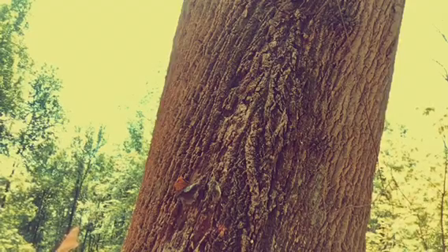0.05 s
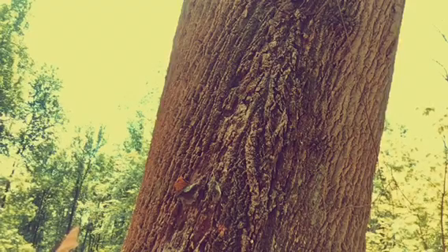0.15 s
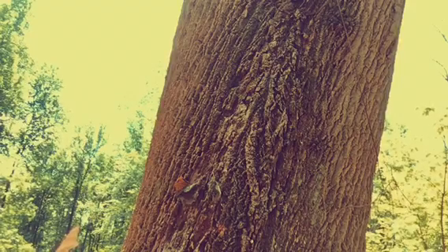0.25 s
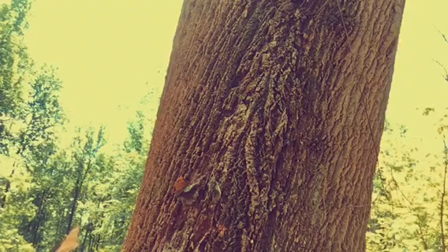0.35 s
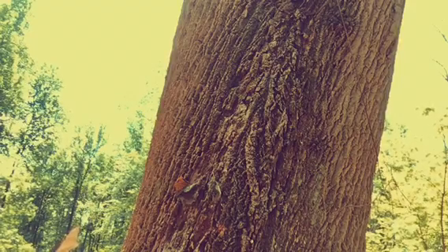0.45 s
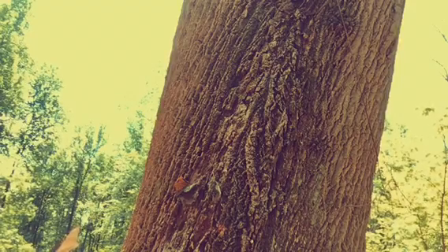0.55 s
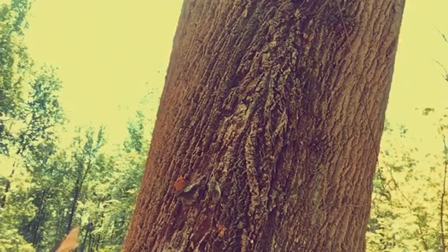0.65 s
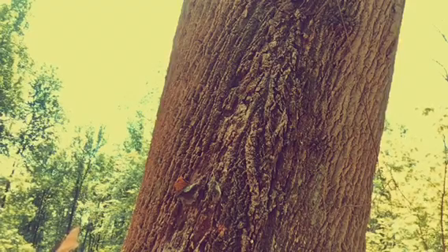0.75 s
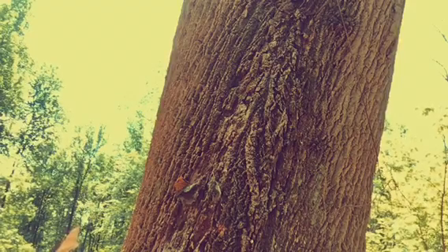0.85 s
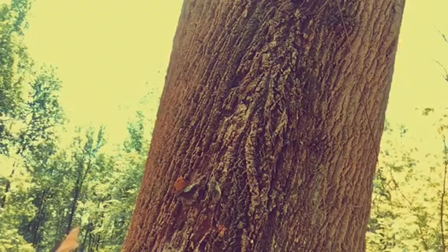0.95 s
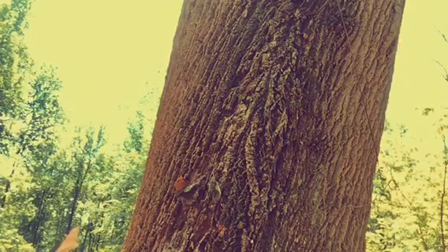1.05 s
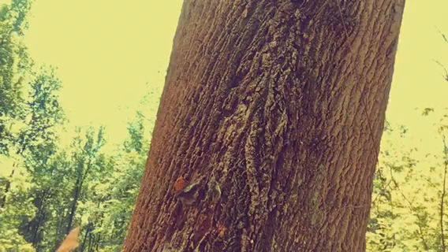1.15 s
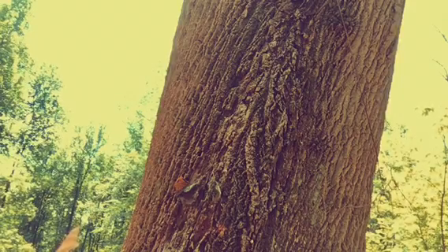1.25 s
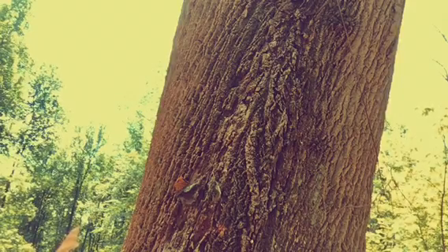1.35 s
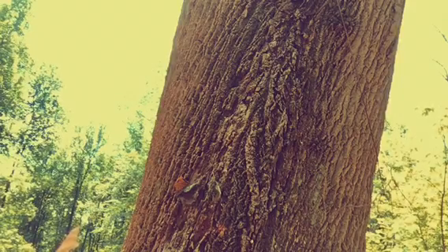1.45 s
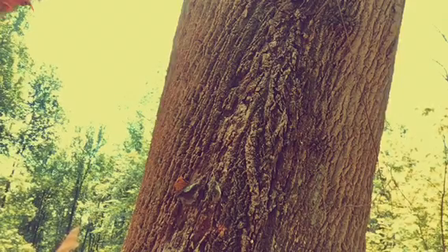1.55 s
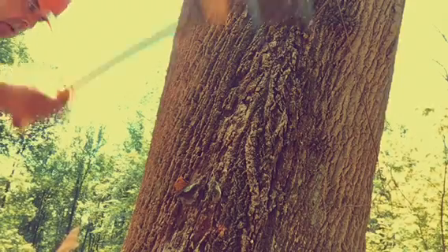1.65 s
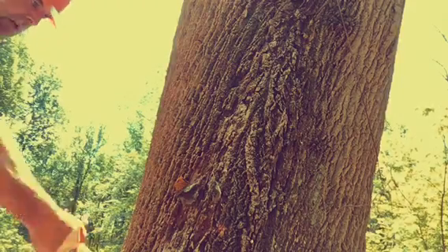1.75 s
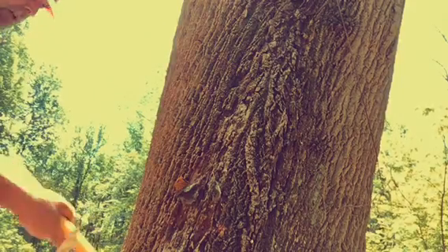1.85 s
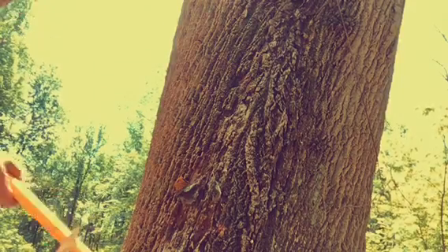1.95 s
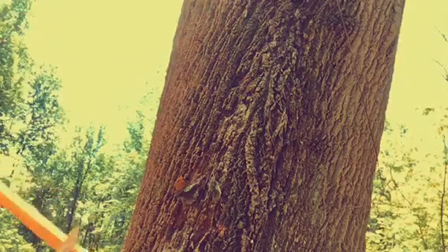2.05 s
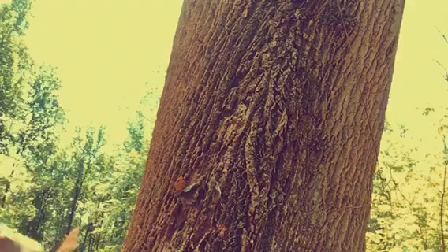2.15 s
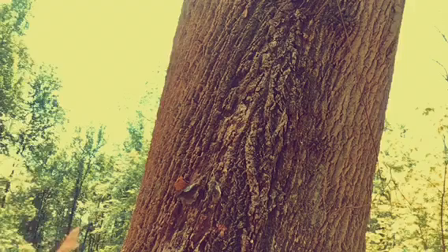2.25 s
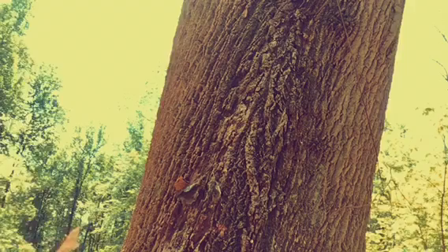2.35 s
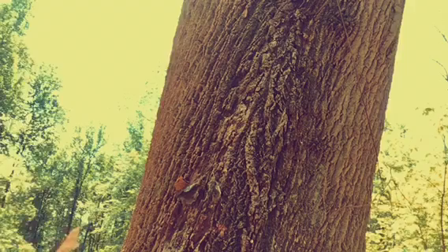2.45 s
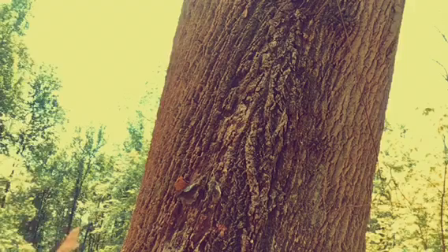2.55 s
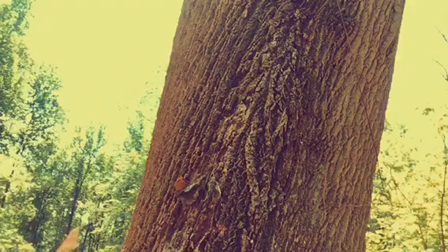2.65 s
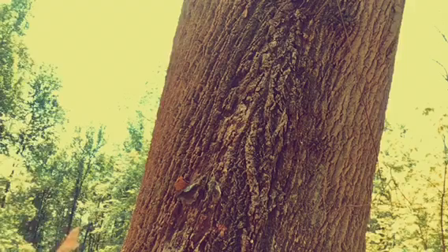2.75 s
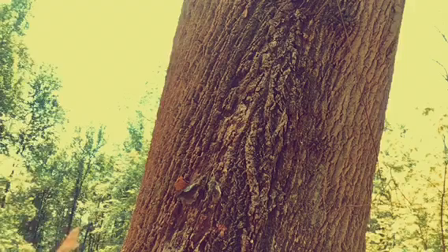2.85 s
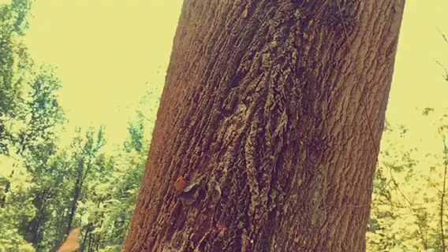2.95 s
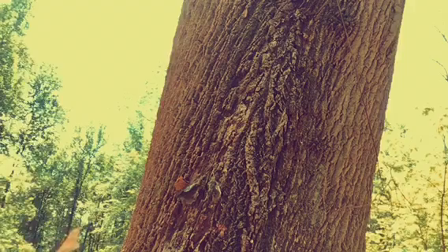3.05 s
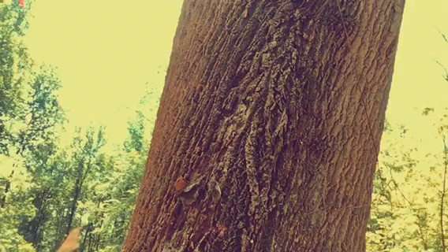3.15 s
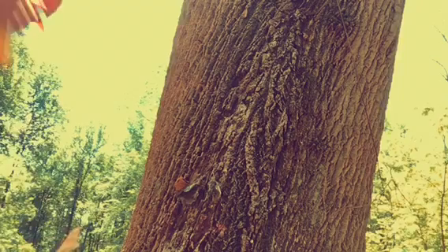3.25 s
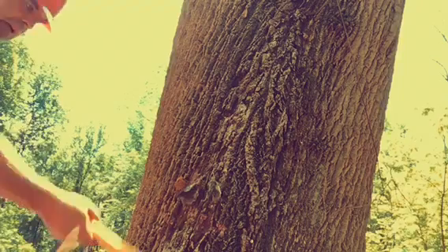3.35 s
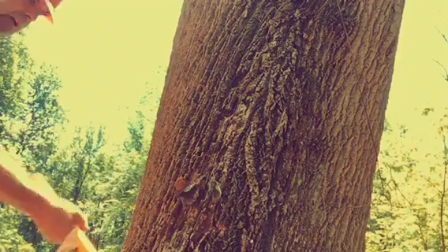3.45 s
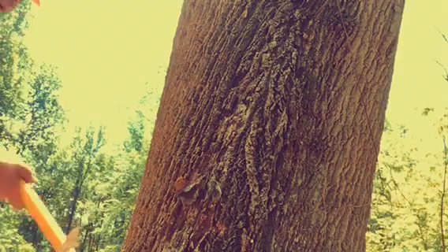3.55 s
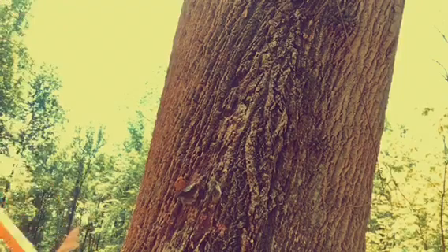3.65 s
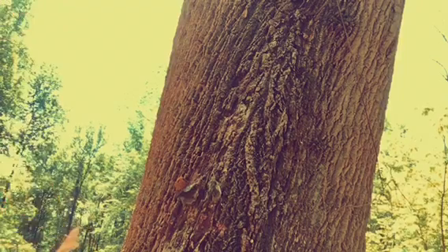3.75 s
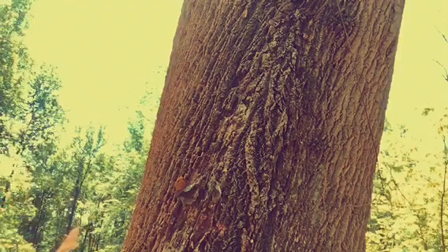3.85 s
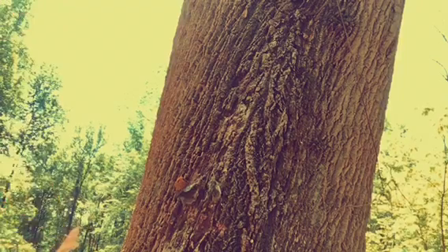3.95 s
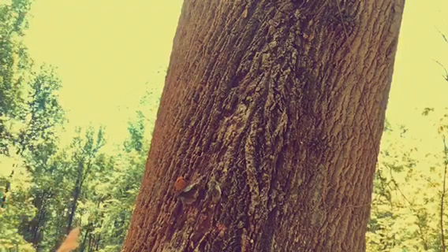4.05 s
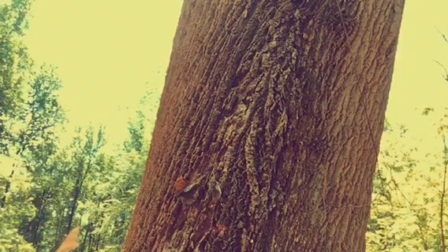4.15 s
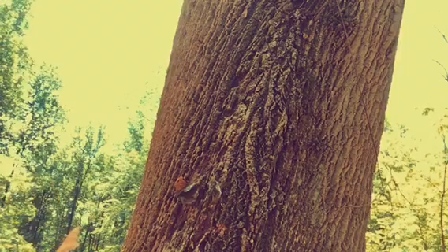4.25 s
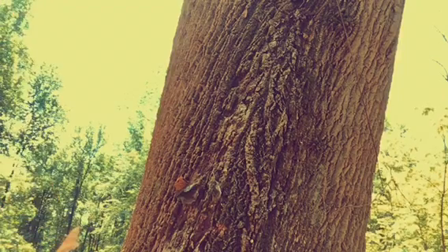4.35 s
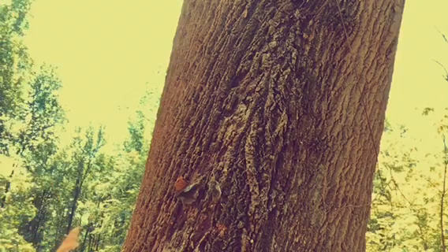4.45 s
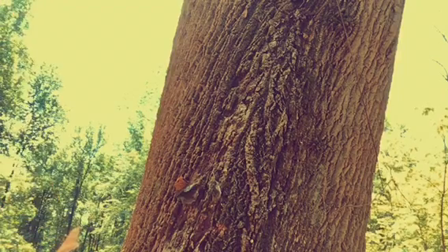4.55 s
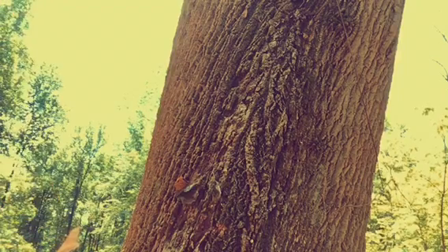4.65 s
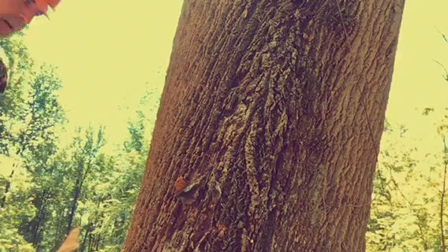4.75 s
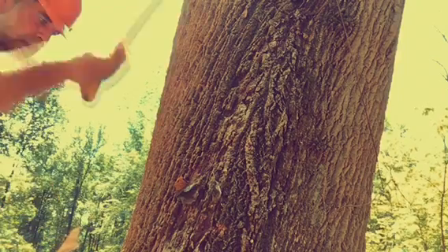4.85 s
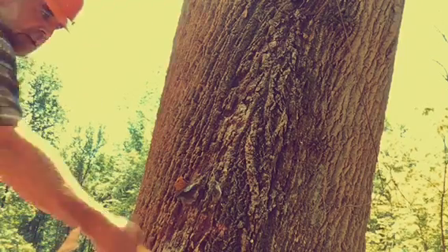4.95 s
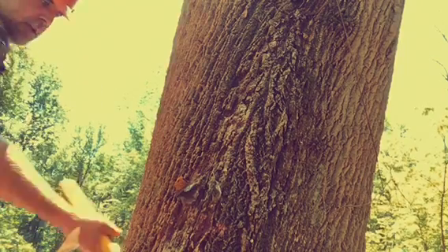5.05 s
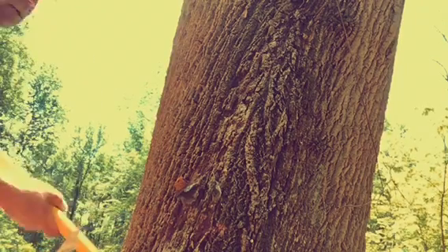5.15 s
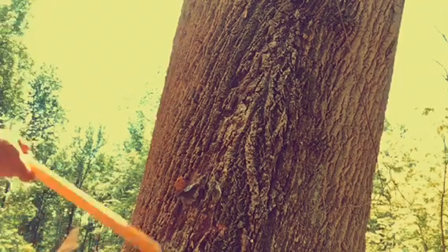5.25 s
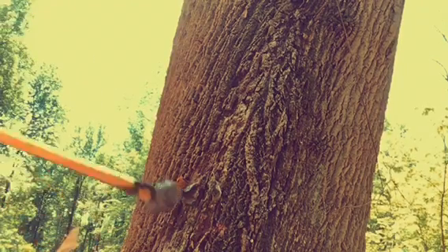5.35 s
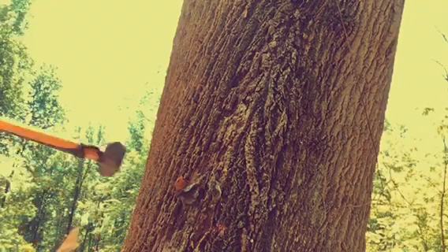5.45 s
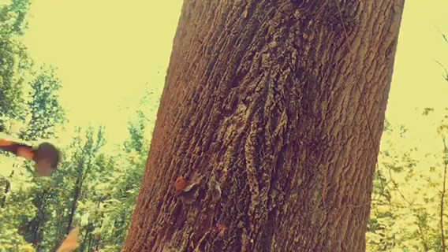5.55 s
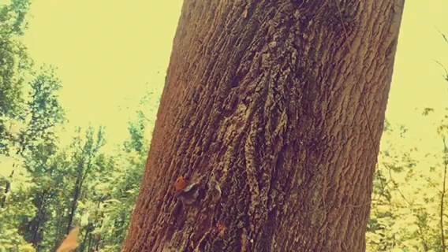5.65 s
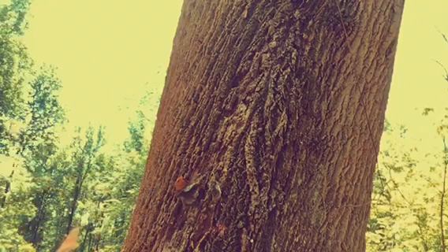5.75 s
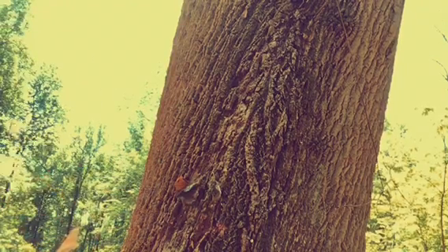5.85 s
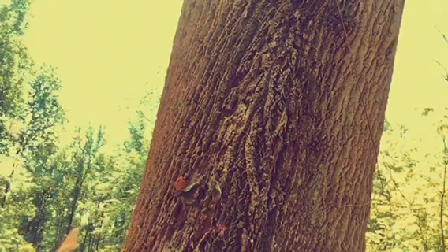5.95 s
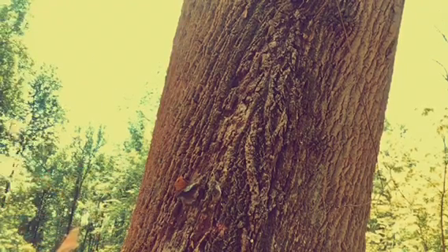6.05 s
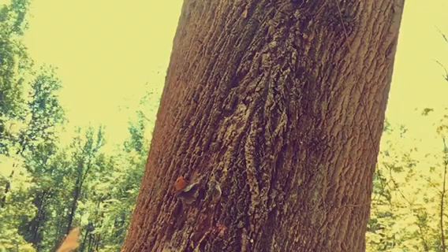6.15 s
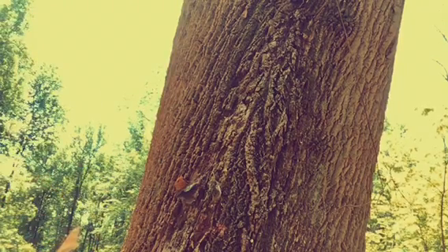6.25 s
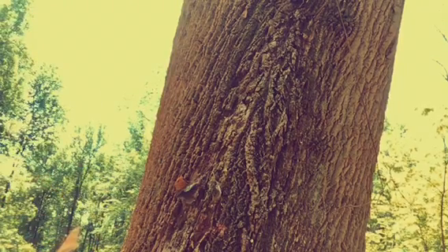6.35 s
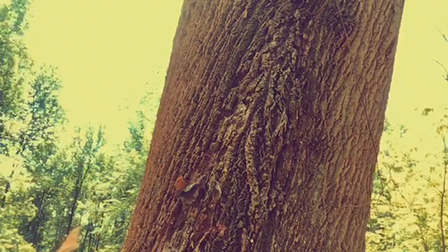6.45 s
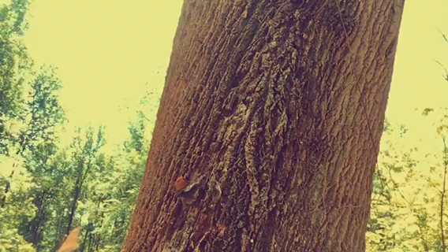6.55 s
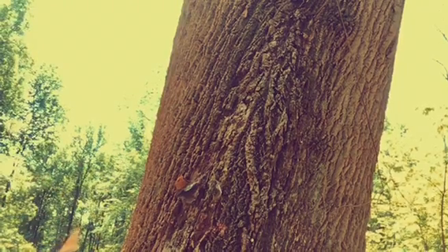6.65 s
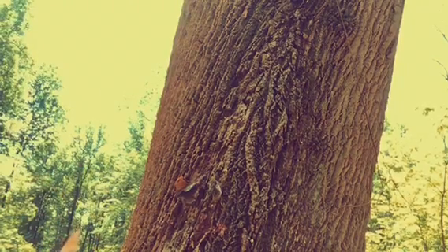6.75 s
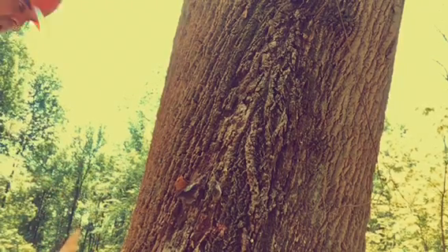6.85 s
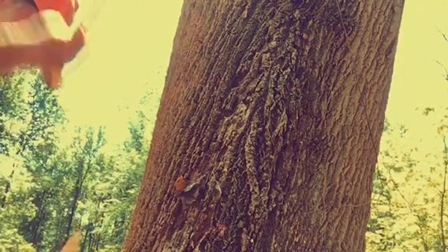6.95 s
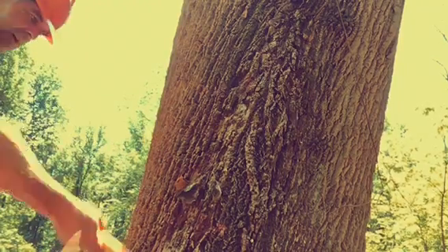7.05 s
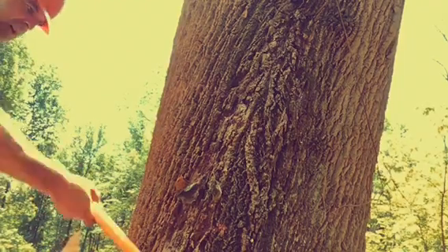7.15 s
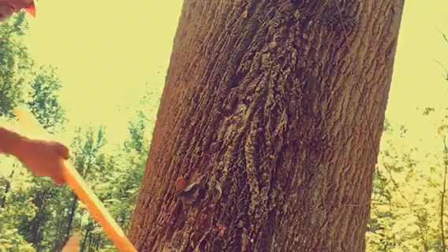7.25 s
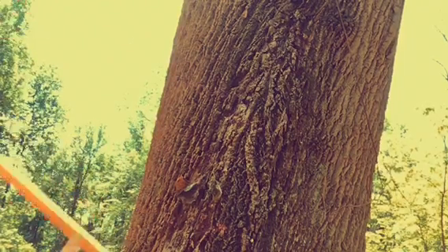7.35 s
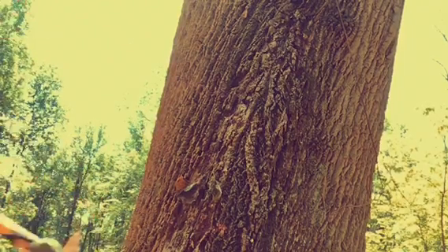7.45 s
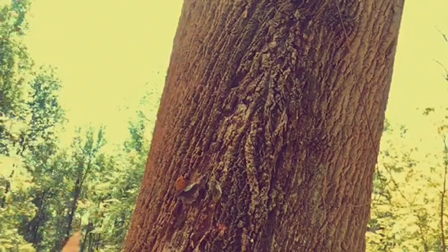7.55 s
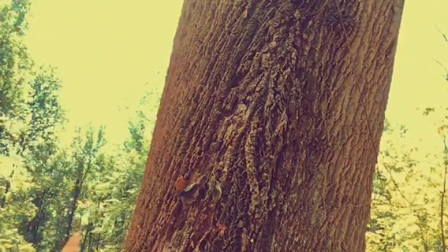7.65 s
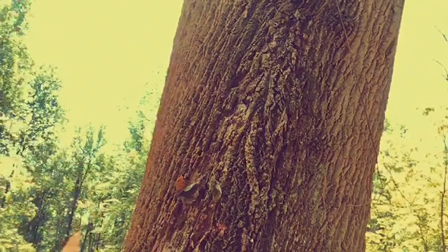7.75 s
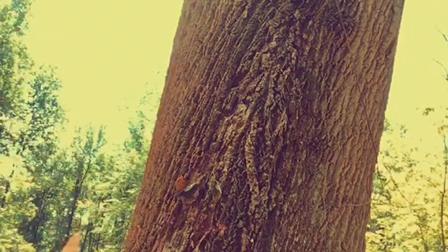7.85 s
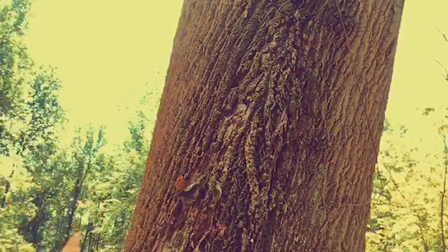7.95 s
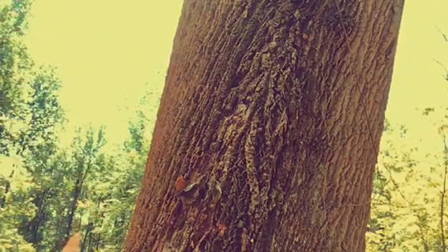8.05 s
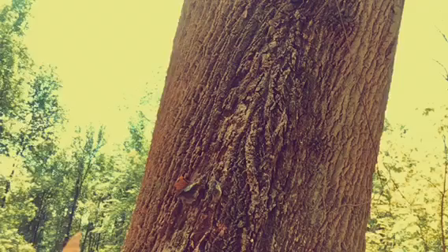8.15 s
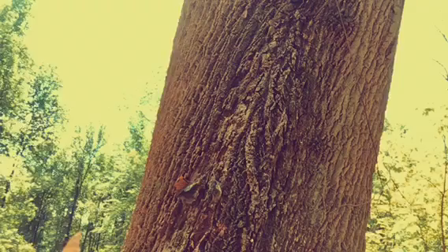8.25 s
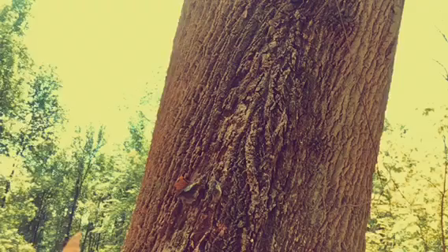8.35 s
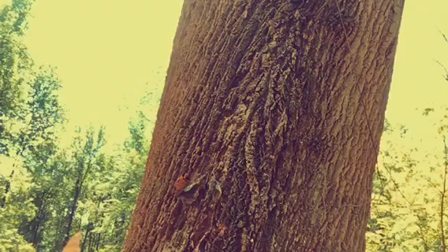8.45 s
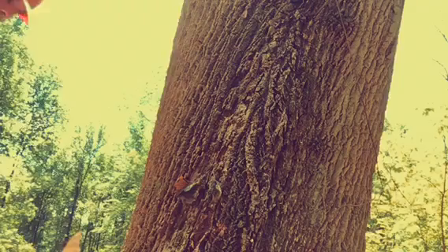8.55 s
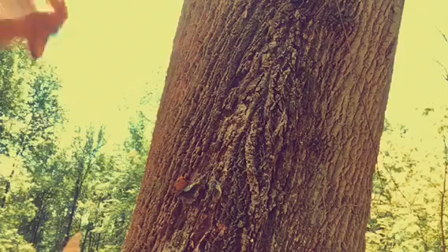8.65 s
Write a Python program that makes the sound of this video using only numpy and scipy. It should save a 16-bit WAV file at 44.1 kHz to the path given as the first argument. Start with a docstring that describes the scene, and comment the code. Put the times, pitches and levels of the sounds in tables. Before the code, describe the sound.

Close, mono sound of tree chopping: soft leaf litter and a faint low drone first, then four hard axe hits, each preceded by a brief faint swish and tiny ticks. The wood cracks sharply, the trunk thumps, and the forest answers with a fading echo. A distant bird whistles before the second stroke; twigs crack underfoot after the third, chips fall after the last, then it quietens.

```python
"""Four axe strokes bite into a standing tree, close enough to overload the microphone.
Noise bands that die at their own rates make each crack of splitting wood and the late answer of the woods.
Sines swell for the shaken trunk and ring thinly for the steel; shaped noise swishes and ticks ahead of each blow.
Between strokes short noise contacts tick as bark chips, sticks and footfalls, and grains crackle as dry leaves.
A far bird whistles in gliding sines, over filtered noise for a low rumble, a drone and a hush of foliage."""
import sys
import numpy as np
from scipy import signal
from scipy.fft import rfft, irfft, next_fast_len
from scipy.io import wavfile

SR = 44100
rng = np.random.default_rng(int(sys.argv[2]) if len(sys.argv) > 2 else 0)


def int16_out(signal):
    """Quantize to a 16-bit WAV file."""
    q = np.round(np.clip(np.atleast_2d(signal).T, -1, 1) * 32767)
    wavfile.write(sys.argv[1], SR, q.astype(np.int16))


N = 383229
TIME = np.arange(N) / SR

# axe strokes into the trunk: t/s, swish level/dB, tick level/dB, puff level/dB, crack level/dB,
# knock f/Hz, knock boost/dB, splinter f/Hz, splinter boost/dB, brightness/(dB per octave),
# trunk level/dB, steel level/dB, woods level/dB (relative to the crack)
STROKES = [(1.8257, -29, -8, -20, 8.5, 1730, 10, 2072, 4, .5, 1, -28, -3),
           (3.454, -25.5, 0.5, 6.5, 0.5, 1493, 5, 4473, 7.5, 2.2, -1.5, -56, 3),
           (5.0440, -27.5, -7, -21, 6.5, 640, 7, 4210, 1, 1, 2, -26, 0.5),
           (7.1404, -23, -2, -15, 5.5, 1332, 6.5, 3853, 9, -1.32, -1.5, -49, -3.5)]
# spectrum of dry leaves and litter: f/Hz, relative level/(dB per Hz)
LEAVES = [(300, 0.5), (1000, -1.5), (1900, 2.5), (3500, 1.5), (7000, -3), (11000, -9.5), (15500, -15.5)]
# spectrum of low rumble, in air, soil and trunk: f/Hz, relative level/(dB per Hz)
RUMBLE = [(20, -26), (40, -9), (62, 4), (85, -0.5), (130, -10.5), (200, -15), (270, -18.5), (400, -54)]


def from_db(db):
    """Turn decibels into an amplitude factor."""
    return 10 ** (np.asarray(db) / 20)


def rms_one(x):
    """Scale a sound to an rms of 1."""
    return x / np.sqrt(np.mean(x ** 2) + 1e-20)


def at_hz(points, hz):
    """Read a table on a log-frequency axis."""
    table = np.array(points)
    return np.interp(np.log(hz), np.log(table[:, 0]), table[:, 1])


def add(out, s, sound):
    """Mix a sound in from time s."""
    start = max(round(s * SR), 0)
    out[start:start + len(sound)] += sound[:N - start]


def dying(t, t60):
    """Exponential decay that falls 60 dB in t60 seconds."""
    return from_db(-60 * t / t60)


def swell(t, middle_s, width_s):
    """A smooth rise and fall, 1 at its middle."""
    return np.exp(-((t - middle_s) / width_s) ** 2)


def coloured(x, spectrum, tilt_db=0):
    """Give a noise a spectrum, tilted in dB per octave; rms 1."""
    size = next_fast_len(len(x))
    hz = np.maximum(np.fft.rfftfreq(size, 1 / SR), 1)
    gain = from_db(at_hz(spectrum, hz) + tilt_db * np.log2(hz))
    return rms_one(irfft(rfft(x, size) * gain, size)[:len(x)])


def band(x, low_hz, high_hz):
    """Keep one band of a sound, with gentle slopes."""
    edges = [low_hz, min(high_hz, .45 * SR)]
    return signal.sosfilt(signal.butter(2, edges, "band", fs=SR, output="sos"), x)


def boosted(x, hz, db, sharpness):
    """Raise one resonance out of a sound; sharpness is its Q."""
    peak = signal.lfilter(*signal.iirpeak(hz, sharpness, fs=SR), x)
    return x + (from_db(db) - 1) * peak


def burst(t, spectrum, t60s, tilt_db=0):
    """Noise in half-octave bands, each dying at its own rate; starts at about rms 1."""
    edges = np.geomspace(140, 17000, 15)
    centres = np.sqrt(edges[1:] * edges[:-1])
    levels_db = at_hz(spectrum, centres) + tilt_db * np.log2(centres)
    gains = from_db(levels_db) * np.sqrt(np.diff(edges))  # per-Hz level to band level
    bands = []
    for low, high, hz in zip(edges, edges[1:], centres):
        noise = rms_one(band(rng.standard_normal(len(t)), low, high))
        bands.append(noise * dying(t, at_hz(t60s, hz)))
    return gains @ np.array(bands) / np.linalg.norm(gains)


def contacts(rows, spread, crest_db, attack_s, body_db=-9):
    """Short ticks and knocks: a broad noise resonance over a duller body, dying within a short time."""
    out, t = np.zeros(N), TIME[:SR // 5]
    for s, db, hz, t60 in rows:
        width = 1 + abs(spread)
        crunch = rms_one(band(rng.standard_normal(len(t)), hz / width, hz * width))
        body = rms_one(band(rng.standard_normal(len(t)), hz / 10, hz / 2))
        envelope = dying(t, t60) * (1 - np.exp(-t / attack_s))
        # crest_db is the headroom from the listed level down to the noise's rms
        add(out, s, from_db(db - crest_db) * (crunch + from_db(body_db) * body) * envelope)
    return out


def scattered(x, wet_db=-14, t60=0.3):
    """A short wash of dying noise, as from the trunks around, trails a sound."""
    t = TIME[:SR // 2]
    wash = rng.standard_normal(len(t)) * dying(t, t60)
    return x + from_db(wet_db) * signal.fftconvolve(x, wash / np.linalg.norm(wash))[:N]


def cracks(bite_s=0.00092, attack_s=0.00081):
    """Fibres split as the blade sinks in; each cut colours its crack and echo with two resonances of its own."""
    # splitting wood: f/Hz, relative level/(dB per Hz)
    crack_spectrum = [(150, -3.5), (300, 16), (500, 1.5), (750, 13.5), (1300, 8.5), (2200, 2), (2800, 1),
                      (4000, -2), (6500, -20.5), (10000, -17.5), (15500, -8)]
    # decay of the splitting: f/Hz, t60/s
    crack_t60s = [(150, 0.17), (500, 0.058), (1000, 0.041), (2500, 0.047), (15000, 0.055)]
    # resonances of the wood common to all strokes: f/Hz, boost/dB
    wood_resonances = [(770, 0.5), (2150, 3.5), (3400, 3), (6000, 10), (7000, 6), (8500, 11.5), (12200, 3)]
    out, t = np.zeros(N), TIME[:3 * SR // 2]
    for s, _, _, _, db, knock_hz, knock_db, splinter_hz, splinter_db, tilt_db, _, _, woods_db in STROKES:
        crack = from_db(woods_db) * woods(t, tilt_db)
        since_bite = np.maximum(t[:SR // 4] - bite_s, 0)  # full level until the blade has sunk in
        add(crack, 0, burst(since_bite, crack_spectrum, crack_t60s, tilt_db))
        crack = crack * (1 - np.exp(-t / attack_s))
        crack = boosted(crack, knock_hz, knock_db, sharpness=26.0)
        crack = boosted(crack, splinter_hz, splinter_db, sharpness=6.2)
        ring = cut_ring(t, [(knock_hz, knock_db), (splinter_hz, splinter_db)])
        add(out, s, from_db(db) * (crack + ring))
    for hz, db in wood_resonances:
        out = boosted(out, hz, db, sharpness=8.5)
    return out


def cut_ring(t, resonances, ring_db=-11, ring_t60=0.032):
    """The wood around the cut rings briefly at its resonances, given as (f/Hz, relative level/dB)."""
    ring = sum(from_db(ring_db + db) * np.sin(2 * np.pi * hz * t) for hz, db in resonances)
    return ring * dying(t, ring_t60)


def woods(t, tilt_db, near_db=-23, near_t60=0.3, far_db=-35, edge_s=0.2, clearing_db=-8, edge_width_s=0.032):
    """Nearby trunks scatter a crack at once; the echo lifts when the edge of the clearing is reached."""
    # scatter from the nearby ground and trunks: f/Hz, relative level/(dB per Hz)
    near_spectrum = [(200, 1), (700, 0.5), (1500, -3.5), (2700, -7), (4000, -5.5), (6500, -20.5),
                     (10000, -22), (15000, -20.5)]
    # echo of the far trees: f/Hz, relative level/(dB per Hz)
    far_spectrum = [(200, -3), (500, -5.5), (1000, 3.5), (1500, 0), (2200, -0.5), (2800, -3), (4000, -2.5),
                    (6500, -23), (10000, -18), (15000, -68)]
    # decay of that echo: f/Hz, t60/s
    far_t60s = [(200, 3.47), (1500, 2.27), (4000, 1.71), (9000, 1.32), (15000, 0.3)]
    near = coloured(rng.standard_normal(len(t)), near_spectrum, tilt_db) * dying(t, near_t60)
    reached = (1 + np.tanh((t - edge_s) / edge_width_s)) / 2
    far = burst(t, far_spectrum, far_t60s, tilt_db) * from_db(clearing_db * (1 - reached))
    return from_db(near_db) * near + from_db(far_db) * far


def trunk(lag_s=0.00635, shove_db=4, shove_hz=44, shove_t60=0.061, shudder_db=-17, shudder_t60=1.0):
    """The blade shoves the trunk; each bending mode swells in its own time, and the crown shudders on."""
    # bending modes of the trunk: f/Hz, relative level/dB, swell/s, t60/s (from the end of the swell)
    bending_modes = [(52.5, -5.5, 0.0081, 0.49), (80, -3, 0.074, 0.093), (95.36, -8.5, 0.0863, 0.11),
                     (105.64, -8.5, 0.094, 0.12), (133.8, -16, 0.025, 0.58), (154.9, -11.5, 0.02, 0.38),
                     (211, -9.5, .025, 0.26), (244.8, -3, 0.0022, 0.16), (274.8, -4, 0.0009, 0.13),
                     (359, -13, 0.0021, 0.11)]
    out, t = np.zeros(N), TIME[:SR]
    bending = np.zeros(len(t))
    for k, (hz, db, swell_s, t60) in enumerate(bending_modes):
        envelope = np.minimum(t / swell_s, 1) * dying(np.maximum(t - swell_s, 0), t60)
        bending += (-1) ** k * from_db(db) * envelope * np.sin(2 * np.pi * hz * t)  # alternating polarity
    shove = from_db(shove_db) * np.sin(2 * np.pi * shove_hz * t) * dying(t, shove_t60)
    for s, *_, trunk_db, _, _ in STROKES:
        shudder = from_db(shudder_db) * coloured(rng.standard_normal(SR), RUMBLE) * dying(t, shudder_t60)
        add(out, s + lag_s, from_db(trunk_db) * (bending - shove + shudder))
    return out


def axe_head(waver_db=5.0):
    """The steel sings thinly in dying sines after each stroke, wavering in level as the head moves."""
    # ring of the axe head: f/Hz, relative level/dB, t60/s
    steel_modes = [(8500, 13, .06), (9545, -3, .85), (9572, -6, .4), (12700, -13, .3)]
    out, t = np.zeros(N), TIME[:SR]
    ring = sum(from_db(db) * np.sin(2 * np.pi * hz * t) * dying(t, t60) for hz, db, t60 in steel_modes)
    for s, *_, steel_db, _ in STROKES:
        waver = np.interp(t, np.linspace(0, t[-1], 36), rng.standard_normal(36))
        add(out, s, from_db(steel_db + waver_db * waver) * ring)
    return out


def swings(swish_lead_s=0.045, swish_rise_s=0.021, swish_tilt_db=-4.0,
           puff_lag_s=0.016, puff_width_s=0.016, puff_low_hz=34, puff_high_hz=95):
    """The rush of the swing grows, then holds until the blade lands; it drives a low puff at the microphone."""
    swish, puff = np.zeros(N), np.zeros(N)
    for s, swish_db, _, puff_db, *_ in STROKES:
        full_s = s - swish_lead_s
        rush = swell(np.minimum(TIME, full_s), full_s, swish_rise_s) * (TIME < s)
        swish += from_db(swish_db) * rush
        puff += from_db(puff_db) * swell(TIME, s + puff_lag_s, puff_width_s)
    rush_noise = coloured(rng.standard_normal(N), LEAVES, swish_tilt_db)
    puff_noise = rms_one(band(rng.standard_normal(N), puff_low_hz, puff_high_hz))
    return swish * rush_noise + puff * puff_noise


def ticks(lead_s=.022, gap_s=.0113, lead_tick_hz=3720, lead_tick_t60=0.01, second_db=-10):
    """Two light, sharp ticks run just ahead of each stroke; chips and twigs snap or land as short noise ticks."""
    # bark chips and twigs: t/s, level/dB, centre f/Hz, t60/s
    chips = [(.777, -26, 3550, 0.13), (0.827, -26.5, 4800, 0.096), (1.782, -23.5, 2980, 0.018),
             (2.515, -17.5, 5770, 0.044), (2.555, -15.5, 4460, 0.035), (3.28, -22.5, 6000, 0.01),
             (4.136, -24.5, 4860, 0.025), (4.174, -32, 10000, .022), (4.559, -31, 4850, 0.044),
             (4.644, -19, 6800, .019), (4.711, -31, 6500, .027), (5.648, -17.5, 4300, 0.02),
             (5.958, -24, 6030, 0.023), (5.97, -21, 2980, 0.018), (6.04, -27, 3600, 0.05),
             (7.7394, -7.5, 5100, 0.023), (7.786, -16.5, 5900, 0.009), (7.888, -18.5, 5250, 0.034)]
    lead_ticks = []
    for s, _, db, *_ in STROKES:
        for k in range(2):
            lead_ticks.append((s - lead_s + k * gap_s, db + k * second_db, lead_tick_hz, lead_tick_t60))
    return contacts(lead_ticks + chips, spread=1.2, crest_db=5, attack_s=.0007)


def feet(stick_hz=1960, stick_t60=0.036, footfall_t60=0.071, thump_db=-20.5, thump_lag_s=.05, thump_width_s=0.086):
    """Sticks crack with a woody knock; soles thud on the soil, which gives with a low thump."""
    # sticks that crack underfoot: t/s, level/dB
    stick_cracks = [(5.401, -10), (5.415, -13), (5.443, -24), (5.475, -9.5), (6.104, -7), (6.124, -13.5)]
    # dull footfalls on the soil: t/s, level/dB, centre f/Hz
    footfalls = [(1.127, -13, 785), (6.709, -14, 374), (6.949, -21, 357)]
    stick_rows = [(s, db, stick_hz, stick_t60) for s, db in stick_cracks]
    sticks = contacts(stick_rows, spread=0.3, crest_db=12, attack_s=.0004, body_db=-10.5)
    thud_rows = [(s, db, hz, footfall_t60) for s, db, hz in footfalls]
    thuds = contacts(thud_rows, spread=0.95, crest_db=12.0, attack_s=0.00033)
    # thump_db is relative to the listed level of each footfall
    thump = sum(from_db(db + thump_db) * swell(TIME, s + thump_lag_s, thump_width_s) for s, db, _ in footfalls)
    return sticks + thuds + thump * coloured(rng.standard_normal(N), RUMBLE)


def leaves(grains_per_s=5000, size_db=-1.0, clump_db=3.0, attack_s=.009, release_s=.013,
           stir_lead_s=0.01, stir_width_s=0.23):
    """Dry leaves crackle in clumps of tiny clicks: a crunch while the foot slides, amid a longer stirring."""
    # scuffs: start t/s, length/s, crunch level/dB, level/dB of the leaves stirred around it,
    # brightness/(dB per octave)
    scuffs = [(0.391, 0.026, -41.5, -61, 4), (0.773, 0.032, -40, -63, 0), (1.04, .11, -38.5, -44.5, 0.5),
              (2.408, 0.017, -39, -53, 13), (2.545, 0.033, -20.5, -41, 1.5), (4.334, 0.026, -40, -76, 2.5),
              (4.928, 0.055, -45, -43.5, 0), (5.399, 0.081, -25, -33.5, 1.9),
              (6.037, 0.018, -28.5, -59, 1.3), (6.061, .07, -32, -44.5, 1), (7.872, 0.035, -35, -57, 2.5)]
    out, t = np.zeros(N), TIME[:SR] - .5  # half a second either side of the scuff's start
    for s, length_s, crunch_db, stir_db, tilt_db in scuffs:
        clumps = np.interp(t, np.linspace(t[0], t[-1], num=160), rng.standard_normal(size=160))
        grain_db = size_db * np.minimum(rng.exponential(1, len(t)), 4) + clump_db * clumps
        sizes = from_db(grain_db) * rng.standard_normal(len(t))
        grains = sizes * (rng.random(len(t)) < grains_per_s / SR)
        crunch = np.clip(t / attack_s, 0, 1) * np.exp(-np.maximum(t - length_s, 0) / release_s)
        stir = swell(t, -stir_lead_s, stir_width_s)
        level = np.hypot(from_db(crunch_db) * crunch, from_db(stir_db) * stir)
        crackle = level * coloured(grains, LEAVES, tilt_db)
        add(out, s + t[0], crackle[s + t >= 0])
    return out


def crumbs(per_s=18, level_db=-48, size_db=4, crumb_tilt_db=0.5, stir_db=-56, stir_tilt_db=0.0,
           rest_s=7.9, rest_fade_s=0.043, rest_db=-23):
    """Bark crumbs, few large among many small, patter into stirring litter that quietens when the work stops."""
    falls = (rng.random(N) < per_s / SR) * from_db(size_db * np.minimum(rng.exponential(1, N), 3))
    tick = dying(TIME[:SR // 20], t60=.022)
    envelope = np.sqrt(np.abs(signal.fftconvolve(falls ** 2, tick ** 2)[:N]))  # overlapping ticks add in power
    patter = envelope * coloured(rng.standard_normal(N), LEAVES, crumb_tilt_db)
    stir = coloured(rng.standard_normal(N), LEAVES, stir_tilt_db)
    resting = (1 + np.tanh((TIME - rest_s) / rest_fade_s)) / 2
    return from_db(rest_db * resting) * (from_db(level_db) * patter + from_db(stir_db) * stir)


def bird(waver_hz=12, throb_db=1.0):
    """Thin whistles glide to their last pitch and level off, pitch and loudness wavering together."""
    # whistles: start t/s, length/s, first f/Hz, last f/Hz, relative level/dB
    whistles = [(2.88, .14, 2930, 2920, -43), (3.0, .14, 2910, 2940, -43), (2.93, .32, 2030, 2160, -45),
                (3.12, .34, 2740, 2790, -50)]
    out = np.zeros(N)
    for s, length, first_hz, last_hz, db in whistles:
        u = np.linspace(0, 1, int(length * SR))  # progress through the whistle
        waver = np.interp(u, np.linspace(0, 1, 10), rng.standard_normal(10))
        hz = last_hz + (first_hz - last_hz) * (1 - u) ** 2 + waver_hz * waver
        tone = np.sin(2 * np.pi * np.cumsum(hz) / SR)
        add(out, s, from_db(db + throb_db * waver) * np.sin(np.pi * u) * tone)
    return out


def air(hiss_db=-46, rumble_db=-39.0, drone_low_hz=100, drone_high_hz=195):
    """Filtered noises: a soft hush of foliage above a far drone and a low rumble."""
    # hush of foliage: f/Hz, relative level/(dB per Hz)
    hush_spectrum = [(250, -4.5), (320, -7), (600, -8.5), (1500, -9), (3000, -14), (4500, -19.5),
                     (7000, -25), (11000, -33.5), (16000, -35.5)]
    # far low drone: t/s, level/dB
    drone_levels = [(0, -41.5), (.7, -37.5), (1.7, -38.5), (2.7, -47.5), (8.69, -51.5)]
    rumble = from_db(rumble_db) * coloured(rng.standard_normal(N), RUMBLE)
    drone = band(rng.standard_normal(N), drone_low_hz, drone_high_hz)
    drone = rms_one(band(drone, drone_low_hz, drone_high_hz))  # a second pass steepens the slopes
    drone_db = np.interp(TIME, *np.transpose(drone_levels))
    hush = from_db(hiss_db) * coloured(rng.standard_normal(N), hush_spectrum)
    return rumble + from_db(drone_db) * drone + hush


def scene(bird_db=-2):
    """Strokes close by, small sounds of the forest floor, a bird deep among the trees and the air, in mono."""
    strokes = cracks() + trunk() + axe_head() + swings()
    litter = scattered(ticks() + feet() + leaves() + crumbs())
    far_bird = from_db(bird_db) * scattered(bird(), wet_db=-3.5, t60=.5)
    return (strokes + litter + far_bird + air())[None]


def record(dry, cutoff_hz=15900):
    """The strokes overload the input and are clipped flat; a steep low-pass then cuts the top."""
    clipped = np.clip(dry, -1, 1)
    return signal.sosfilt(signal.ellip(10, .1, 80, cutoff_hz, fs=SR, output="sos"), clipped)


dry = scene()
out = record(dry)
int16_out(out)
```